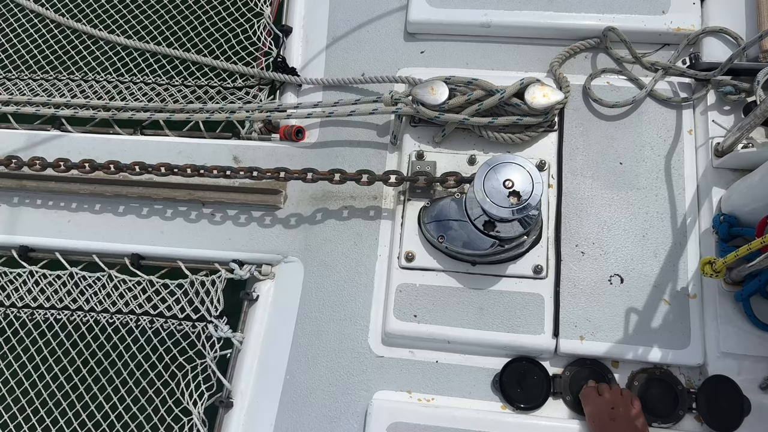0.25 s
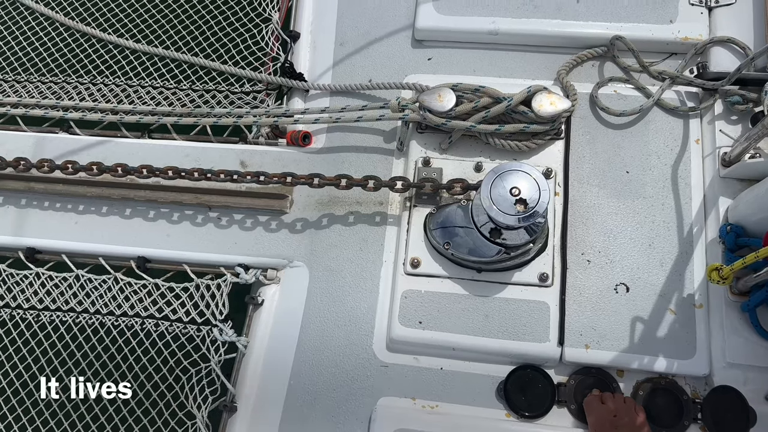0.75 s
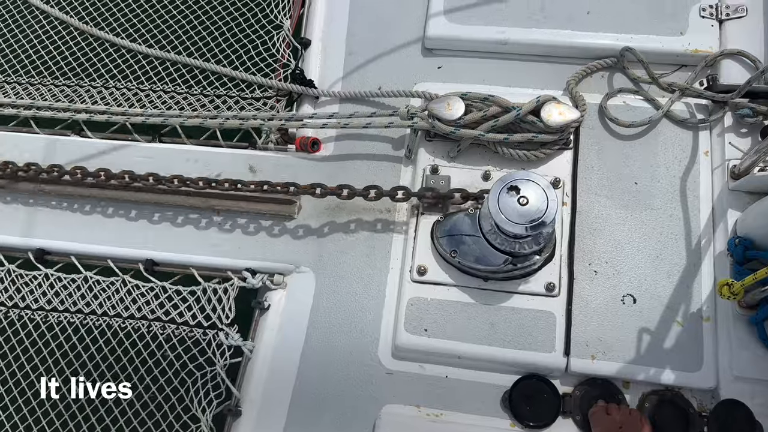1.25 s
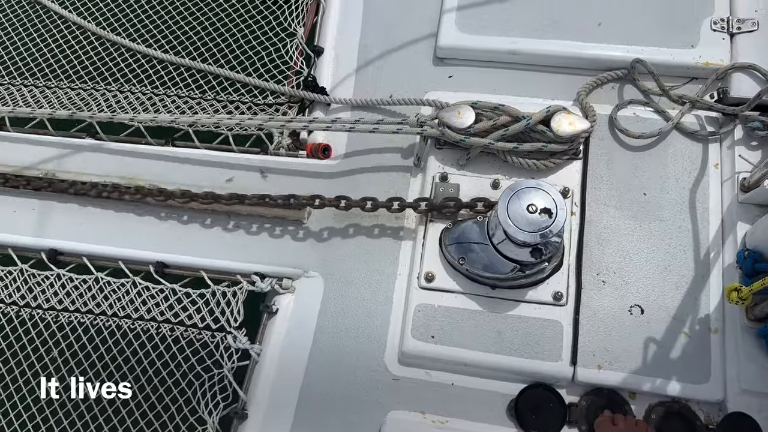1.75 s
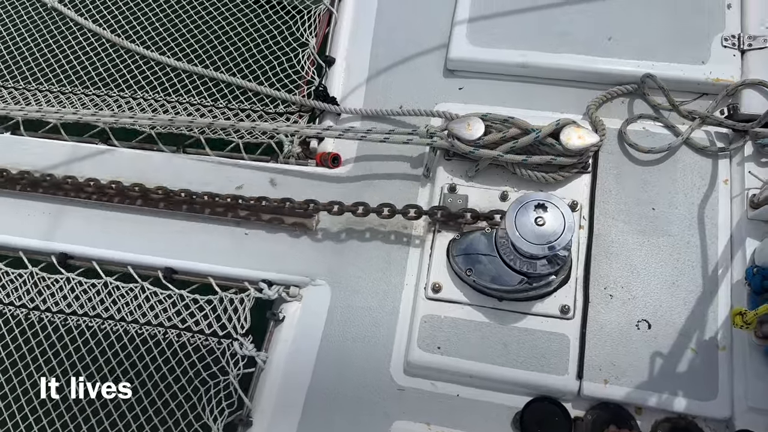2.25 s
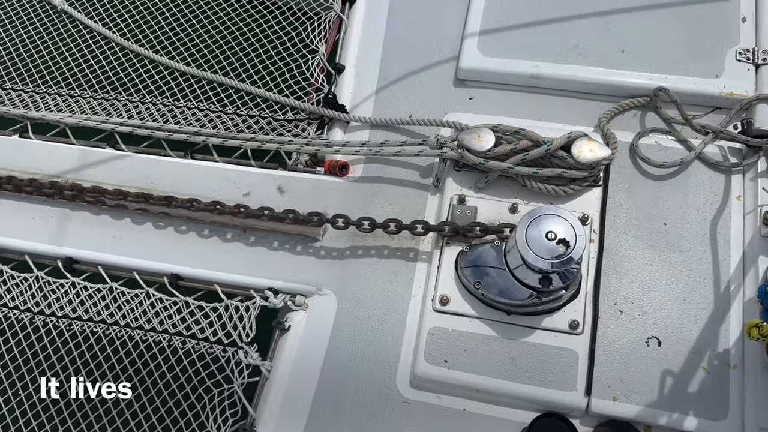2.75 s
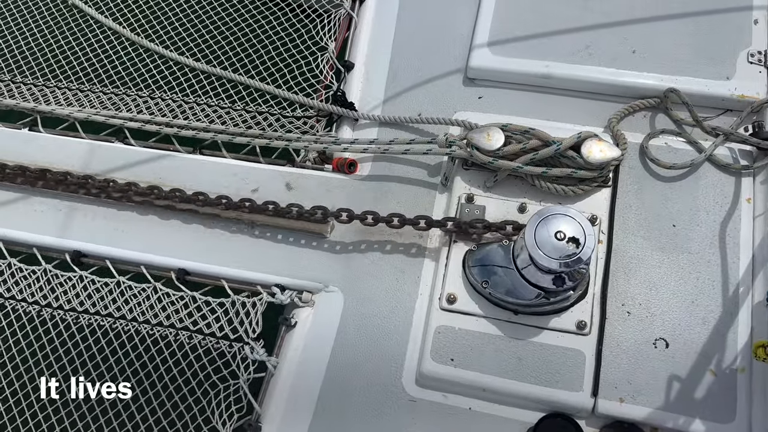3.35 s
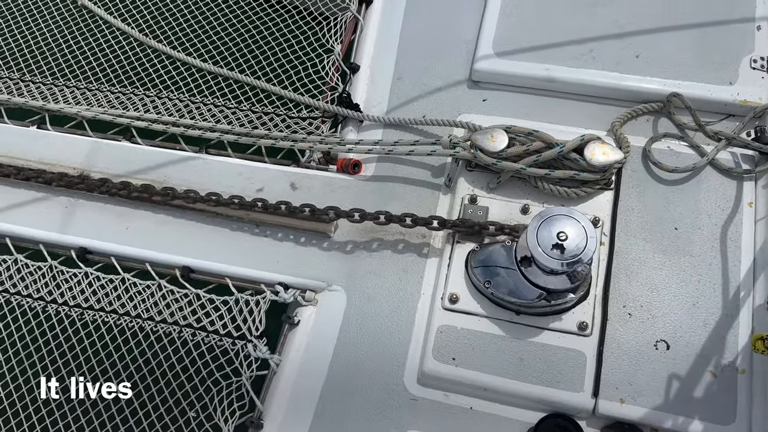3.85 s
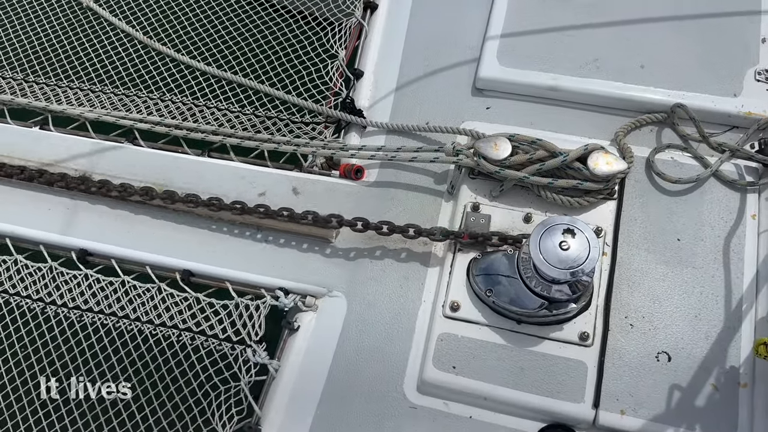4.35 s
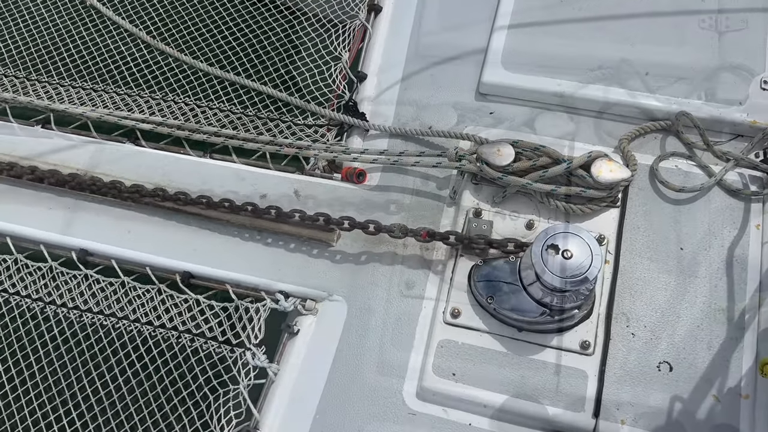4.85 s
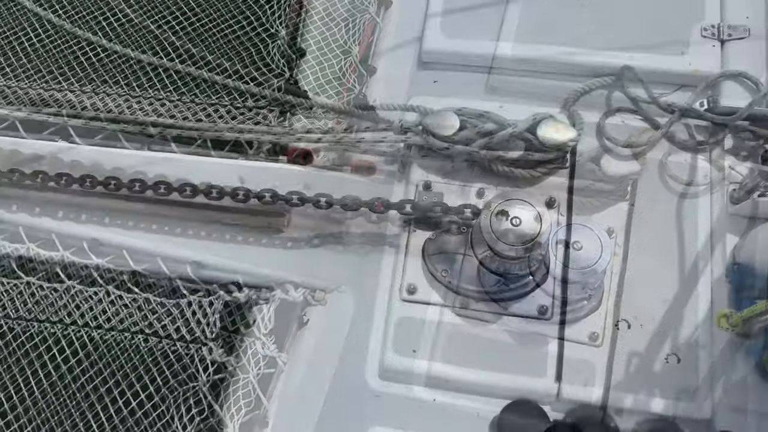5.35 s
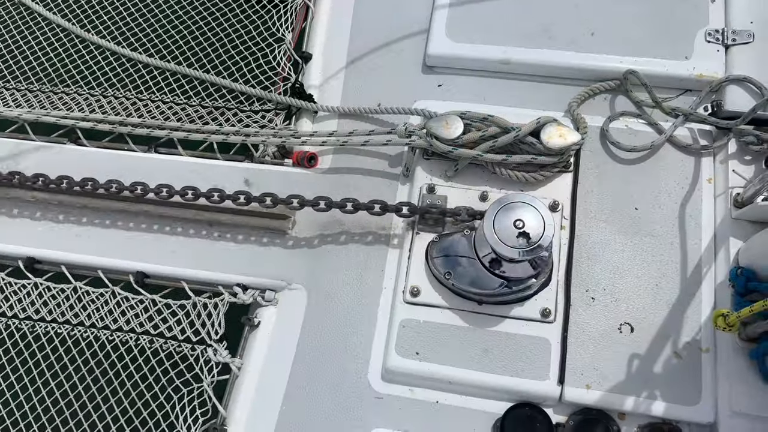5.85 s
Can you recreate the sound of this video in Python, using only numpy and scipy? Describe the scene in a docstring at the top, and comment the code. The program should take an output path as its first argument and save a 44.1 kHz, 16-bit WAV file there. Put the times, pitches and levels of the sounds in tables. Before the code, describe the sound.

Silence until about 0.26 s, then a faint airy hiss and low wind buffets on a phone held close above an open boat deck, with a light hollow knock at 0.3 s. At 0.8 s an electric winch jerks in with a brief rising whine; chain thumps the hollow fibreglass, and a cluster of hard knocks and steel cracks peaks around 1.4 s. The rumble eases towards 2.1 s, then a longer surge builds: sliding links grind and clink, thuds cluster near 2.6 s, and bright metallic snaps into the chain wheel come up to ten a second until about 3.9 s. It slows and thins, almost still by 5 s, leaving wind and faint squeaks. From 5.2 s the drive whines and groans in quickening pulses, and chain clatters again, with loud knocks and clinks at 5.65, 5.8 and 6.05 s. Dry, wide stereo.

```python
"""Wind and a faint hiss set in after a moment of silence, with a first light knock on a hollow deck.
Then an electric windlass hauls anchor chain over the fibreglass foredeck of a catamaran, in surges.
Sliding links rumble, knock and clink, and snap into the steel chain wheel up to about ten times a second.
The drive whines and groans as it spins up. Noise bursts ring filters shaped like deck, steel and links;
gliding tones make the whines, and two ports of a phone held above the deck hear it all."""
import sys
import numpy as np
from scipy import signal
from scipy.fft import rfft, irfft, next_fast_len
from scipy.io import wavfile
from scipy.ndimage import uniform_filter1d

SR = 44100
rng = np.random.default_rng(int(sys.argv[2]) if len(sys.argv) > 2 else 0)


def dump_mix(stems):
    """Bounce the given channels to the path in sys.argv[1] as a 16-bit WAV at rate SR."""
    frames = np.atleast_2d(stems).T  # one column per channel
    limited = np.clip(frames, -1, 1)  # hard clip at full scale
    pcm = np.round(limited * 32767).astype(np.int16)
    wavfile.write(sys.argv[1], SR, pcm)


N = 268709
TIME = np.arange(N) / SR
FREQS = np.fft.rfftfreq(2048, 1 / SR)
HIT_TIME = np.arange(8192) / SR


def undb(db):
    """Decibels to gain."""
    return 10 ** (np.asarray(db) / 20)


def spectrum(points):
    """Gain at each frequency, drawn through (pitch_hz, level_db) points."""
    hz, db = np.transpose(points)
    return undb(np.interp(np.log(FREQS + 1), np.log(hz), db))


def colour(x, gain):
    """Filter that responds without delay; only the shape of the gains counts, white noise keeps its power."""
    # folding the cepstrum forward in time gives the minimum-phase response
    cepstrum = irfft(np.log(gain + 1e-6))
    half = len(cepstrum) // 2
    cepstrum[1:half] *= 2
    cepstrum[half + 1:] = 0
    response = irfft(np.exp(rfft(cepstrum)))[:half]
    response = response / np.linalg.norm(response)
    return signal.fftconvolve(x, response[None], axes=1)[:, :x.shape[1]]


def noise(size=N):
    """Two unrelated noises: the sound that both ports share, and the scattered rest."""
    return rng.standard_normal((2, size))


def walk(rate):
    """Random wander with a spread near 1, through rate random points a second."""
    knots = rng.standard_normal(N // 100)
    return 1.2 * np.interp(TIME * rate, np.arange(len(knots)), knots)


def add(out, s, sound):
    """Mix a sound in at time s, in seconds."""
    start = max(int(s * SR), 0)
    part = out[:, start:start + sound.shape[1]]
    part += sound[:, :part.shape[1]]


def blow(gain, db, rise_s, fall_s, tail_db=-16, tail_s=0.013, size=8192):
    """One contact: a burst of chatter and a weak tail ring a body; db is its loudest 4 ms."""
    t = HIT_TIME[:size]
    decay = np.exp(-t / fall_s) + undb(tail_db) * np.exp(-t / tail_s)
    shape = (1 - np.exp(-t / rise_s)) * decay
    sound = colour(noise(size=len(t)) * shape, gain)
    power = uniform_filter1d(sound ** 2, size=176, axis=1).max(axis=1, keepdims=True)
    return sound * undb(db) / np.sqrt(power)


# surges of the chain: start_s, pick_up_s, run_s, slow_down_s, top_speed (0-1)
SURGES = [(0.803, 0.12, 0.0092, 0.15, 0.27), (1.049, 0.12, 0.033, 1.38, 0.44),
          (2.14, 0.32, 0.89, 1.89, 0.46), (5.172, 0.42, 0.11, 0.14, 0.53), (5.76, 0.31, .1, 0.21, 0.63)]


def chain_speed():
    """Each surge picks up, runs steadily and slows evenly; the fastest one carries the chain."""
    speed = np.zeros(N)
    for s, pick_up_s, run_s, slow_s, top in SURGES:
        rise = np.clip((TIME - s) / pick_up_s, 0, 1)
        fall = np.clip(1 - (TIME - s - pick_up_s - run_s) / slow_s, 0, 1)
        speed = np.maximum(speed, top * rise * fall)
    return speed


AIR_START_S = 0.261  # hiss and steady wind begin
HISS_DROP_DB, HISS_DROP_S = -6.5, 0.31  # the hiss sinks by this much, over this time
# colour of the hiss: pitch_hz, level_db
AIR = [(1800, 1.5), (4300, -7.5), (5200, 12.5), (8500, 8.5), (9600, 4), (10500, -35), (16000, -73)]


def air(level_db):
    """A faint noise hiss that sinks once the winch runs."""
    sunk = np.clip((TIME - SURGES[0][0]) / HISS_DROP_S, 0, 1)
    hiss = colour(noise() * (TIME > AIR_START_S), spectrum(AIR))
    return undb(level_db + HISS_DROP_DB * sunk) * hiss


BREEZE_DB, FLUTTER_DB = -38.5, 3  # wind between gusts, before the flutter; spread of the flutter
# colour of the wind: pitch_hz, level_db
GUST = [(20, -47), (45, -9), (75, -1), (230, -9.5), (800, -39), (4000, -92)]
# gusts on the ports, levels before the flutter: peak_s, half_length_s, level_db
GUSTS = [(.92, 0.045, -31), (1.336, 0.17, -36), (1.92, 0.06, -28), (3.68, 0.14, -31), (4.95, 0.4, -37.5),
         (5.75, 0.42, -30)]
# single buffets of wind: start_s, level_db
BUFFETS = [(0.294, -17.5), (0.307, -16), (0.41, -25.5), (0.502, -29.5), (0.558, -28.5), (0.731, -30.5),
           (1.899, -19.5), (3.631, -24.5), (3.676, -23), (4.979, -26.5)]


def wind():
    """Eddies rumble on the ports, swelling with each gust; a few strike as single thumps."""
    power = undb(BREEZE_DB) ** 2
    for s, half_s, db in GUSTS:
        power = power + undb(db) ** 2 * np.exp(-2 * ((TIME - s) / half_s) ** 2)
    strength = np.sqrt(power) * undb(FLUTTER_DB * walk(30)) * (TIME > AIR_START_S)
    out = colour(noise() * strength, spectrum(GUST))
    for s, db in BUFFETS:
        add(out, s, blow(spectrum(GUST), db, rise_s=0.00033, fall_s=0.007))
    return out


# broad colour of the deck: pitch_hz, level_db
DECK = [(90, -16.5), (300, 2.5), (600, 3), (1350, -6.5), (1800, -16.5), (3000, -29), (6000, -52)]
# panel resonances of the deck: pitch_hz, width_hz, level_db
PANELS = [(343, 25, 1), (431, 64, -6), (747, 80, -4), (910, 113, -6.5), (1195, 140, -11)]


def deck_gain():
    """The hollow deck: a broad body with its panel resonances on top."""
    gain = spectrum(DECK)
    for hz, width, db in PANELS:
        gain = gain + undb(db) / (1 + (2 * (FREQS - hz) / width) ** 2)
    return gain


# a struck link rings at a few pitches, drawn afresh each time for where it is hit and held
RING_LOW_HZ, RING_HIGH_HZ, RING_Q, RING_DB = 1200, 5600, 24, 10
# broad colour of the steel: pitch_hz, level_db
STEEL = [(600, -20), (1300, -0.5), (2000, 6.5), (3300, -5), (6500, -9), (9000, -11.5), (12500, -27),
         (16000, -32)]


def steel_gain(count=5):
    """One steel contact: the broad clank with a few narrow rings of its own."""
    # one random pitch in each of count equal musical steps
    steps = (np.arange(count) + rng.random(count)) / count
    pitches = RING_LOW_HZ * (RING_HIGH_HZ / RING_LOW_HZ) ** steps
    rings = sum(1 / (1 + (2 * RING_Q * (FREQS / hz - 1)) ** 2) for hz in pitches)
    return spectrum(STEEL) * np.sqrt(1 + undb(RING_DB) ** 2 * rings)


# blows of the chain on the deck, levels before the trims given to knocks():
# start_s, thud_level_db, main_resonance_hz, steel_crack_level_db
KNOCKS = [(0.296, -29.5, 610, -70), (0.802, -24, 1480, -32), (0.899, -15.5, 920, -17.5),
          (0.955, -11.5, 1430, -37), (0.974, -15.5, 288, -15.5), (1.257, -9.5, 836, -32),
          (1.284, -16.5, 340, -38), (1.413, -7, 774, -16), (1.428, -13, 710, -13.5), (1.453, -7, 1350, -43),
          (1.466, -12, 318, -12.5), (1.509, -14.5, 860, -35), (1.61, -20, 970, -27),
          (1.809, -15.5, 720, -26.5), (1.857, -16, 329.2, -50), (1.871, -20, 484, -28.5),
          (2.202, -19.5, 890, -20.5), (2.25, -16.5, 1350, -21.5), (2.3873, -11.5, 920, -13.5),
          (2.6, -8.5, 1270, -21), (2.63, -9, 620, -17), (2.638, -9, 1050, -25), (2.66, -11.5, 1030, -12),
          (2.705, -14.5, 416, -28), (2.926, -12, 590, -14), (3.099, -12, 810, -25), (3.249, -14, 1110, -28),
          (3.264, -13.5, 890, -15.5), (3.277, -16, 357, -15), (3.479, -13.5, 1030, -15),
          (3.504, -14, 1010, -17), (3.536, -19.5, 973.6, -21), (3.698, -17, 1010, -20),
          (4.119, -20, 950, -29), (4.2, -17.5, 1160, -19.5), (4.244, -15.5, 1178, -29),
          (4.259, -14, 720, -27), (4.624, -21.5, 705, -48), (5.043, -24.5, 746, -47),
          (5.075, -21.5, 390, -64), (5.316, -20, 655, -20.5), (5.644, -6, 1050, -11.5),
          (5.66, -8, 866, -16), (5.688, -15, 353.4, -18), (5.814, -7, 827, -19), (6.0185, -11, 640, -19.5),
          (6.046, -6, 1140, -17.5)]


def knocks(slap_db, boom_db, crack_db, focus_db, width_hz):
    """The chain slaps the deck: the struck panel rings briefly, the hull booms on, the steel cracks."""
    deck, steel = np.zeros((2, 2, N))
    body = deck_gain()
    for s, db, hz, steel_db in KNOCKS:
        spot = 1 + undb(focus_db) / (1 + (2 * (FREQS - hz) / width_hz) ** 2)
        slap = blow(body * spot, db + slap_db, rise_s=0.00041, fall_s=0.002, tail_db=-11.5, tail_s=0.021)
        boom = blow(body, db + boom_db, rise_s=0.011, fall_s=0.016)
        crack = blow(steel_gain(), steel_db + crack_db, rise_s=0.0008, fall_s=0.0014)
        add(deck, s, slap)
        add(deck, s, boom)
        add(steel, s, crack)
    return deck, steel


# rings of the chain wheel: pitch_hz, fade_by_60_db_s, level_db
WHEEL = [(3410, 0.045, -20.5), (3690, 0.16, -29.5), (5100, 0.06, -23), (9510, 0.17, -30)]


def wheel(steel):
    """Every sharp steel contact leaves the chain wheel ringing faintly in a few fading tones."""
    t = HIT_TIME
    ring = 0
    for hz, t60, db in WHEEL:
        mode = np.sin(2 * np.pi * hz * t) * np.exp(-np.log(1000) * t / t60)
        ring = ring + undb(db) * mode / np.linalg.norm(mode)
    return signal.fftconvolve(steel, ring[None], axes=1)[:, :N]


# broad treble of a link: pitch_hz, level_db
PING = [(3000, -29), (7200, 2.5), (9400, 10.5), (10300, -1.5), (12300, -23), (13500, -40), (15600, -8.5)]
# short resonances of a link, before any shift or weight: pitch_hz, width_hz, level_db
LINK = [(7530, 1700, -8.5), (8260, 130, -3), (8690, 150, 4.5), (11580, 1150, 8)]


def link_gain(shift=1, weights=np.ones(len(LINK))):
    """A link's broad treble with its short resonances; the way it is held shifts and weights them."""
    gain = spectrum(PING)
    for weight, (hz, width, db) in zip(weights, LINK):
        gain = gain + weight * undb(db) / np.hypot(1, 2 * (FREQS - shift * hz) / width) ** 2
    return gain


def grains(rate, spread_db, fall_s):
    """Envelope of many small contacts of uneven size, rate a second, with an average power of 1."""
    sizes = undb(spread_db * np.minimum(rng.exponential(size=N), 4))
    contacts = (rng.random(N) < rate / SR) * sizes
    power = signal.lfilter([1], [1, -np.exp(-2 / (fall_s * SR))], contacts ** 2)
    return np.sqrt(power / power.mean())


RUMBLE_DB, RUMBLE_POWER = -24, 0.75  # deck rumble at full speed; it grows as this power of the speed
SCRAPE_DB, SCRAPE_POWER = -27.5, 1.482  # the same for steel on steel, which dies sooner as the chain slows


def drag(speed, jingle_db):
    """Sliding links: dense small contacts rumble in the deck, scrape on steel and blur into a fine jingle."""
    deck = undb(RUMBLE_DB) * speed ** RUMBLE_POWER
    steel = undb(SCRAPE_DB) * speed ** SCRAPE_POWER
    contacts = grains(rate=380, spread_db=3, fall_s=0.011)
    rumble = colour(noise() * contacts * deck, deck_gain())
    scrape = colour(noise() * contacts * steel, spectrum(STEEL))
    jingle = colour(noise() * contacts * steel, link_gain())
    return rumble, scrape + undb(jingle_db) * jingle


def bumps(speed, count, level_db, spread_db):
    """Sagging links tap the deck at uneven moments, harder the faster the chain runs."""
    out = np.zeros((2, N))
    body = deck_gain()
    for k, (when, force) in enumerate(rng.random((count, 2))):
        i = int((k + when) / count * N)  # one random moment in each equal slice of time
        tap_db = level_db + spread_db * (2 * force - 1)
        tap = blow(body, tap_db, rise_s=0.0006, fall_s=0.004, size=4096)
        add(out, i / SR, tap * speed[i] ** RUMBLE_POWER)
    return out


OVERTONE_BELOW_HZ = 1200  # whines that start lower than this carry overtones
WHINE_WAVER = 0.03  # spread of the pitch wander, as a share of the pitch
# short whines and squeaks, before their wander: start_s, length_s, first_pitch_hz, last_pitch_hz, level_db
WHINES = [(.814, 0.042, 650, 930, -29), (.922, 0.032, 2000, 1920, -31), (4.96, 0.035, 15500, 9500, -61),
          (5.045, 0.15, 14500, 7800, -60), (5.152, 0.082, 2030, 1910, -46.5),
          (5.245, 0.06, 620, 860, -35.5), (5.34, 0.14, 1480, 1780, -40)]


def whines(overtone_db):
    """The gears whine and the steel squeaks briefly, as gliding tones of gritty, unsteady pitch."""
    out = np.zeros((2, N))
    for s, length, first_hz, last_hz, db in WHINES:
        progress = np.clip((TIME - s) / length, 0, 1)
        glide = first_hz + (last_hz - first_hz) * progress
        hz = glide * (1 + WHINE_WAVER * walk(430))
        phase = 2 * np.pi * np.cumsum(hz) / SR
        overtone = undb(overtone_db) * (first_hz < OVERTONE_BELOW_HZ)
        whine = np.sin(phase) + overtone * np.sin(2 * phase) + overtone ** 2 * np.sin(3 * phase)
        swell = np.sin(np.pi * progress)
        out[0] += undb(db + 2 * walk(80)) * swell * whine
    return out


# loose links clinking on each other, levels before the trim given to clatter(): start_s, level_db
CLINKS = [(0.844, -40.5), (0.865, -30.5), (0.928, -25.5), (1.146, -24.5), (1.332, -32), (1.918, -26),
          (2.106, -35), (2.325, -24.5), (2.395, -18.5), (2.488, -29), (3.025, -25), (3.069, -29),
          (3.409, -17.5), (5.243, -38), (5.283, -33), (5.414, -27.5), (5.467, -24), (5.486, -23.5),
          (5.61, -13.5), (5.678, -25), (5.77, -28.5), (5.892, -21), (5.96, -19)]


def clatter(speed, count, loud_db, level_db, spread_db, bright_db):
    """Links clink on each other: a few clear touches among many light ones, each with a colour of its own."""
    out = np.zeros((2, N))
    touches = [(s, db + loud_db) for s, db in CLINKS]
    for when, force in rng.random((count, 2)):
        i = int(when * N)
        if speed[i] > 0:  # light touches only while the chain moves
            speed_db = 20 * SCRAPE_POWER * np.log10(speed[i])
            touches.append((i / SR, level_db + spread_db * force + speed_db))
    ping = undb(bright_db) * link_gain()
    for s, db in touches:
        hardness = rng.random()
        clink = blow(steel_gain() + hardness * ping, db, rise_s=.001, fall_s=.0025, size=2048)
        add(out, s, clink)
    return out


# links snapping into the chain wheel, levels before the trims given to snaps():
# start_s, ping_level_db, clank_level_db
SNAPS = [(0.9523, -14.5, -6), (1.195, -1, -16), (1.252, -9.5, -16.5), (1.308, -3, -15), (1.3762, -8, -21),
         (1.451, -10.5, -10), (1.714, -4.5, -16.5), (2.42, -4.5, -18), (2.547, -7.5, -19),
         (2.6001, -10.5, -14), (2.615, -8, -18.5), (2.676, -4, -14), (2.7666, -6.5, -23), (2.8758, -8, -30),
         (2.979, -4.5, -16.5), (3.077, -9.5, -17), (3.1723, -7, -18), (3.229, -9.5, -23), (3.264, -9, -30),
         (3.3145, -12.5, -22), (3.3609, -4.5, -19), (3.452, -8.5, -20.5), (3.554, -4.5, -14.5),
         (3.648, -6.5, -18), (3.7662, -10.5, -23), (3.893, -6.5, -16), (4.0276, -11, -22),
         (4.407, -10.5, -20.5), (6.0164, -11, -26)]


def snaps(ping_db, clank_db, detune, uneven_db):
    """Links seat in the chain wheel: a very short bright ping, different each time, over a duller clank."""
    out = np.zeros((2, N))
    for s, db, steel_db in SNAPS:
        shift = 1 + detune * rng.standard_normal()
        weights = undb(uneven_db * rng.standard_normal(len(LINK)))
        link = link_gain(shift, weights)
        ping = blow(link, db + ping_db, rise_s=0.00063, fall_s=0.0025, tail_db=-24, tail_s=0.0091)
        clank = blow(steel_gain(), steel_db + clank_db, rise_s=0.0014, fall_s=0.0022,
                     tail_db=-29.5, tail_s=0.067)
        add(out, s, ping)
        add(out, s, clank)
    return out


# the drive groans once a turn as it takes up the load again
GROAN_S, GROAN_LENGTH_S, GROAN_HZ, GROAN_WIDTH_HZ, GROAN_DB = 5.32, 0.26, 700, 140, -26.5
FIRST_TURNS_PER_S, LAST_TURNS_PER_S = 21, 30


def groan():
    """The loaded drive rubs once a turn, faster as it spins up, and rings one narrow resonance."""
    t = np.arange(int(GROAN_LENGTH_S * SR)) / SR
    turns = np.cumsum(np.linspace(FIRST_TURNS_PER_S, LAST_TURNS_PER_S, len(t))) / SR
    rub = ((1 + np.cos(2 * np.pi * turns)) / 2) ** 2
    out = np.zeros((2, N))
    add(out, GROAN_S, noise(size=len(t)) * rub)
    resonance = 1 / (1 + (2 * (FREQS - GROAN_HZ) / GROAN_WIDTH_HZ) ** 2)
    return undb(GROAN_DB) * colour(out, resonance)


# the two ports: pitch_hz, left_lead_radians, left_minus_right_db, likeness (0-1)
PORTS = [(79.6, 0.01, 0.5, 0.86), (450, 0.28, 1.5, 0.98), (580, 0.81, 3.5, 0.9), (1210, 0.79, 0.5, 0.81),
         (1480, 0.81, -3.5, 0.17), (1842, 4.95, -1.5, 0.84), (2860, 6.88, 4.5, 0.77), (6800, 9.5, 8, 0.83),
         (8480, 5.8, -1, 0.85), (11540, 1.18, 0.5, 1)]


def ports(sound):
    """Shared and scattered sound reach two ports, with a lag and shading that change with pitch."""
    size = next_fast_len(N + 4096)
    shared, scattered = rfft(sound, size)
    hz, *columns = np.transpose(PORTS)
    freqs = np.fft.rfftfreq(size, 1 / SR)
    lead, balance_db, likeness = (np.interp(freqs, hz, c) for c in columns)
    likeness = np.clip(likeness, 0, 1)
    side = np.array([[1], [-1]])  # left, right
    mix = np.sqrt((1 + likeness) / 2) * shared + side * np.sqrt((1 - likeness) / 2) * scattered
    shading = undb(side * balance_db / 2)
    lag = np.exp(side * 1j * lead / 2)
    return irfft(mix * shading * lag, size)[:, :N]


def scene():
    """Weather, deck, steel and drive at the phone."""
    speed = chain_speed()
    weather = wind() + air(level_db=-53.0)
    thuds, cracks = knocks(slap_db=-2.5, boom_db=-14, crack_db=-3.5, focus_db=21.5, width_hz=396)
    rumble, scrape = drag(speed, jingle_db=-14.0)
    taps = bumps(speed, count=130, level_db=-18.0, spread_db=3.5)
    loose = clatter(speed, count=340, loud_db=-3, level_db=-27, spread_db=10.5, bright_db=-13.0)
    strikes = cracks + loose + snaps(ping_db=-12.0, clank_db=-3.5, detune=0.015, uneven_db=0.5)
    drive = whines(overtone_db=-7.5) + groan()
    deck = thuds + rumble + taps
    steel = scrape + strikes + wheel(strikes)
    return ports(weather + deck + steel + drive)


TOP_HZ = 15900


def record(dry):
    """The phone rounds the loudest peaks and cuts the top."""
    rounded = np.tanh(dry)
    low_pass = signal.ellip(10, .2, 90, TOP_HZ, fs=SR, output="sos")
    return signal.sosfilt(low_pass, rounded)


dry = scene()
out = record(dry)
dump_mix(out)
```